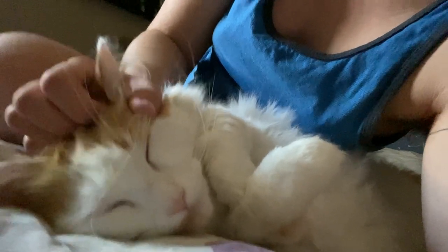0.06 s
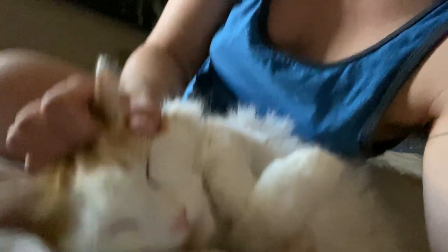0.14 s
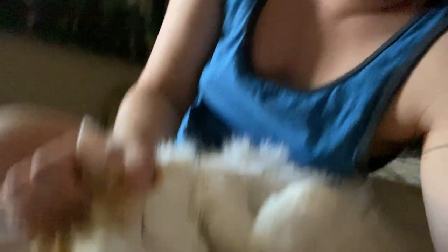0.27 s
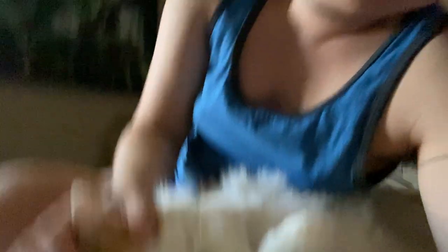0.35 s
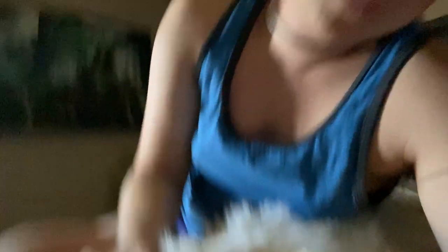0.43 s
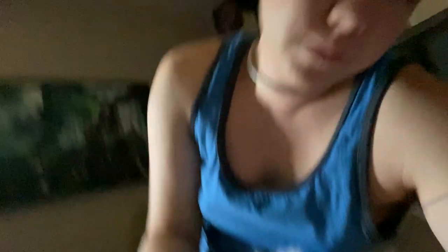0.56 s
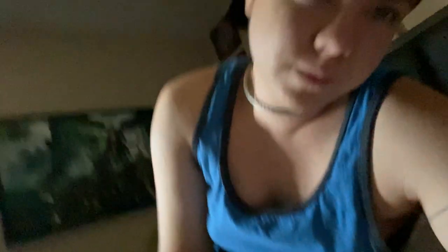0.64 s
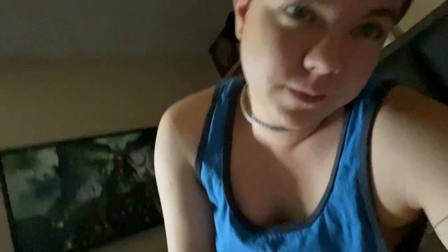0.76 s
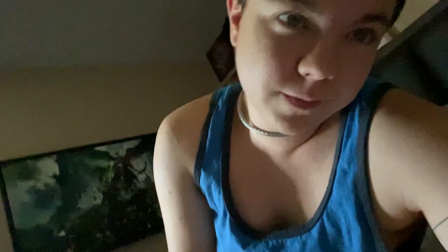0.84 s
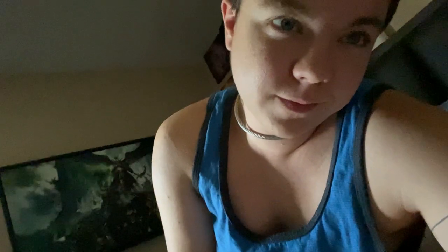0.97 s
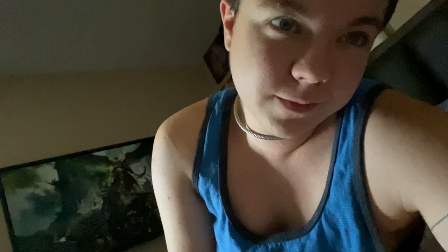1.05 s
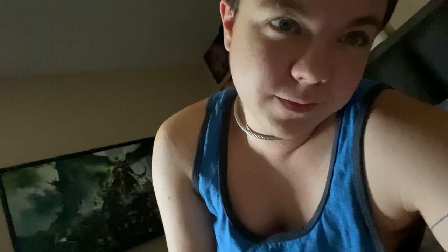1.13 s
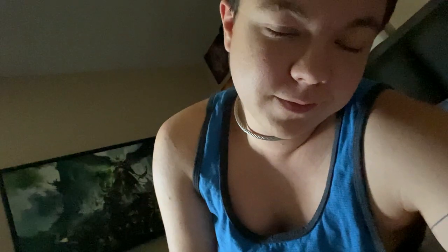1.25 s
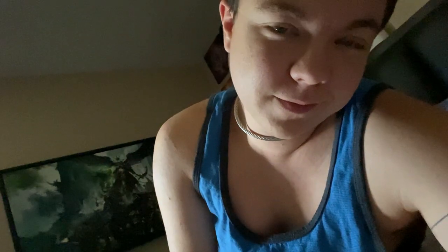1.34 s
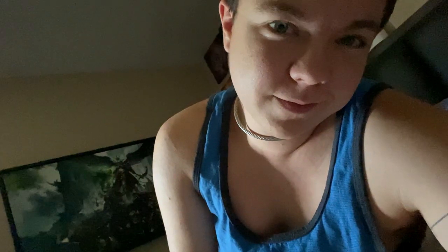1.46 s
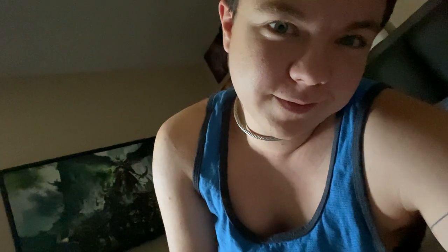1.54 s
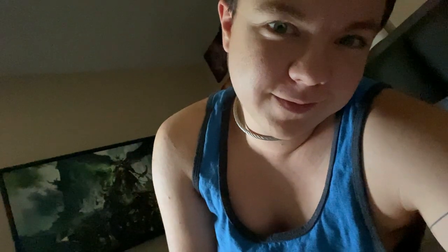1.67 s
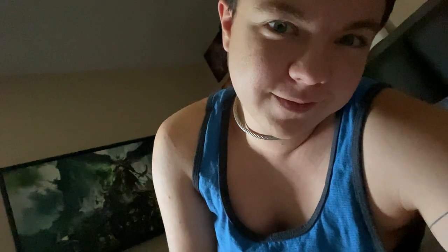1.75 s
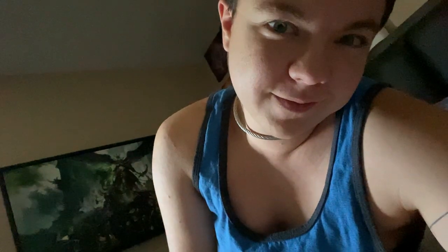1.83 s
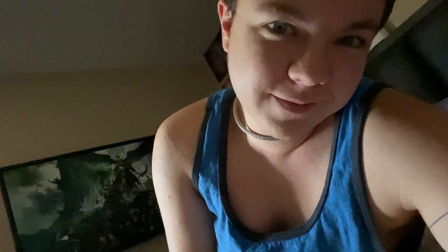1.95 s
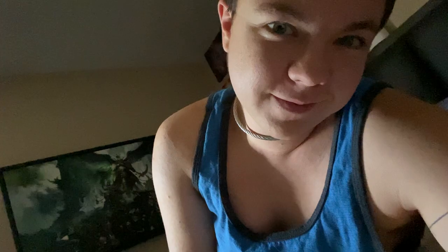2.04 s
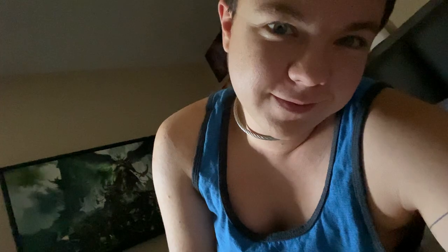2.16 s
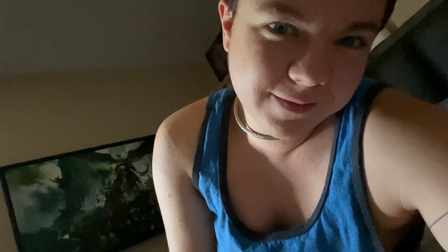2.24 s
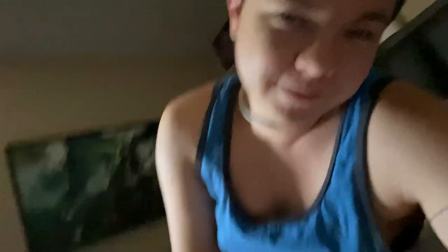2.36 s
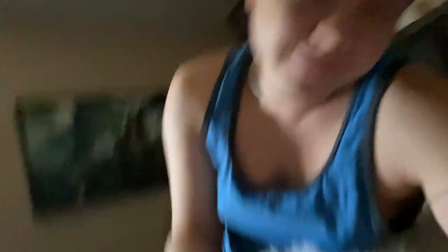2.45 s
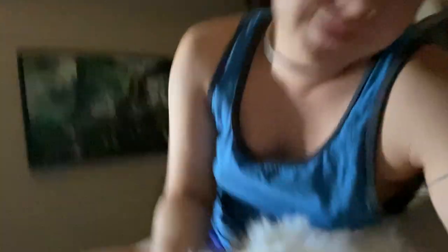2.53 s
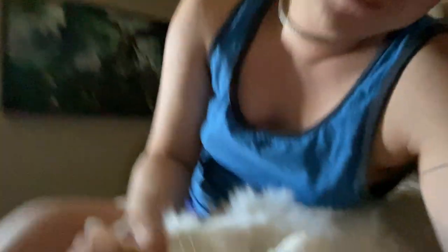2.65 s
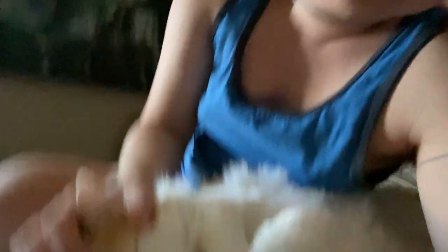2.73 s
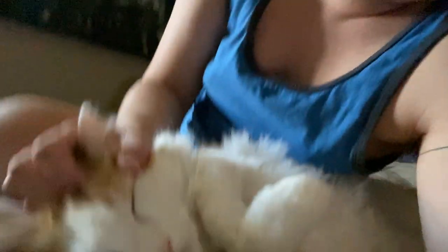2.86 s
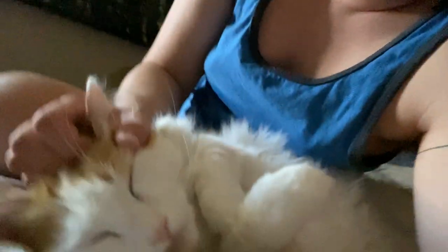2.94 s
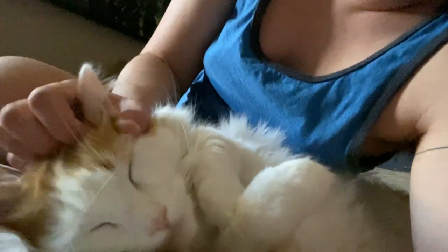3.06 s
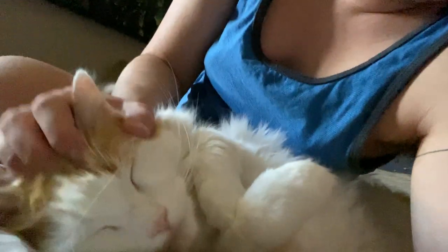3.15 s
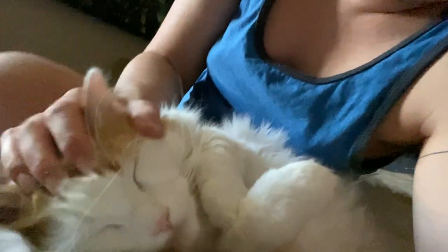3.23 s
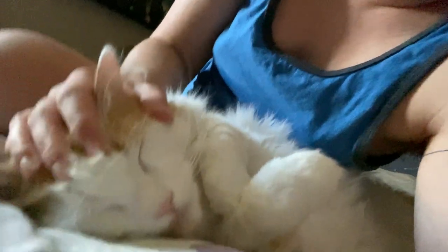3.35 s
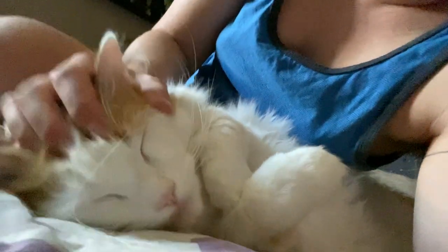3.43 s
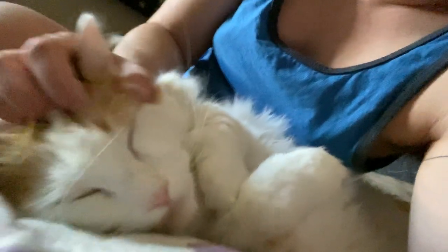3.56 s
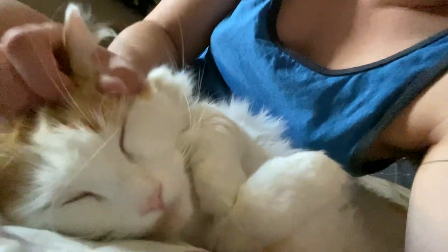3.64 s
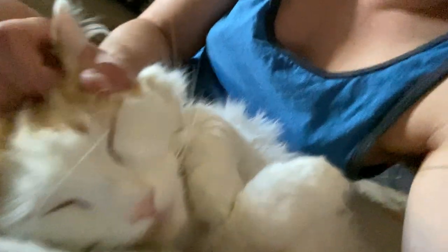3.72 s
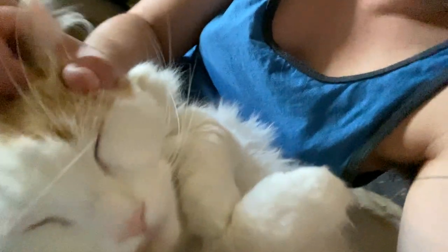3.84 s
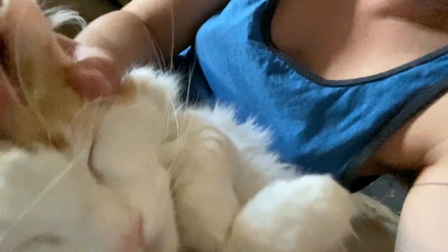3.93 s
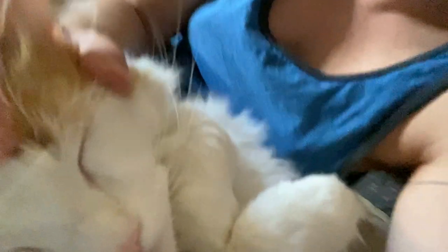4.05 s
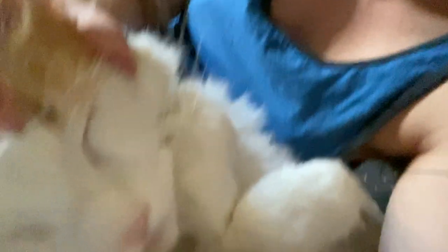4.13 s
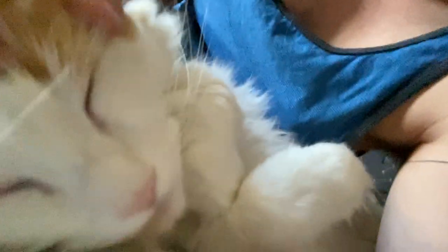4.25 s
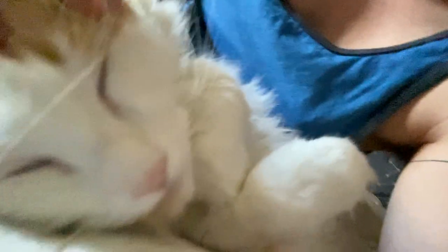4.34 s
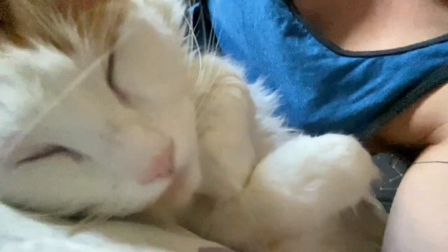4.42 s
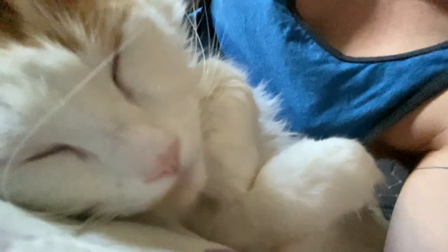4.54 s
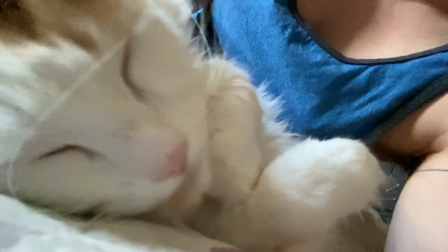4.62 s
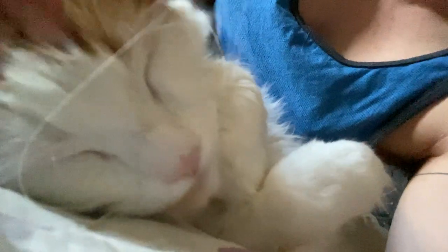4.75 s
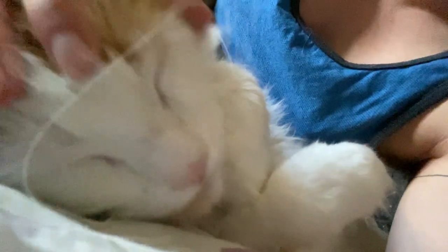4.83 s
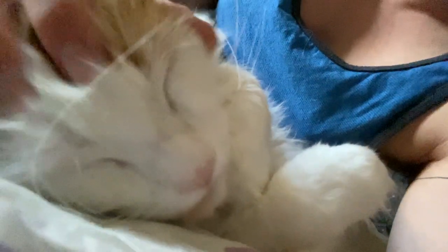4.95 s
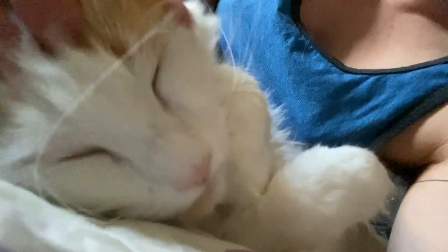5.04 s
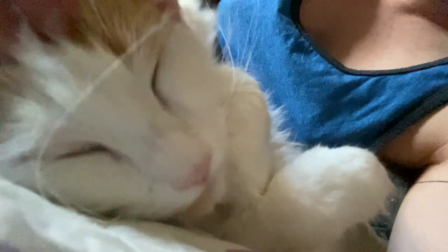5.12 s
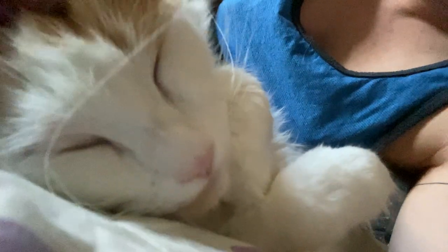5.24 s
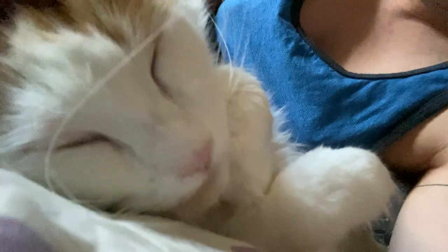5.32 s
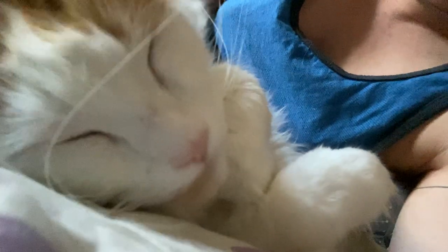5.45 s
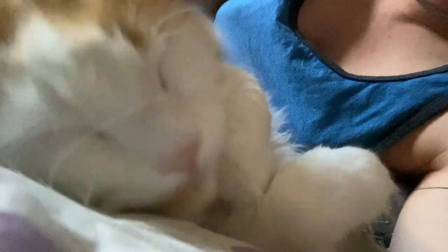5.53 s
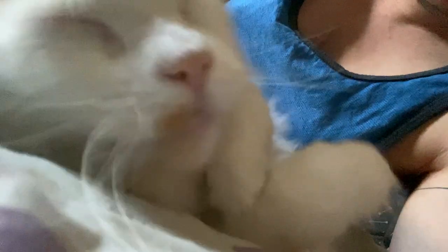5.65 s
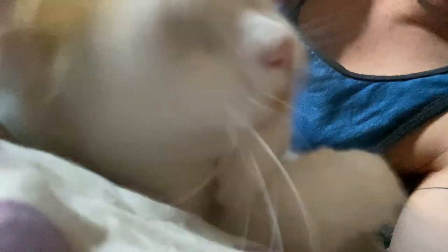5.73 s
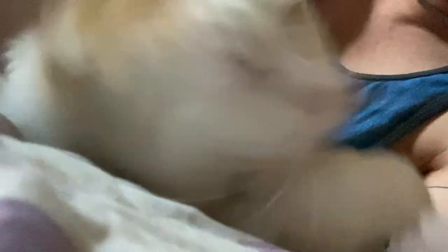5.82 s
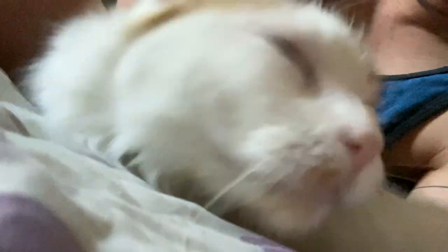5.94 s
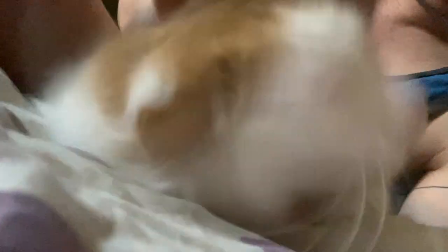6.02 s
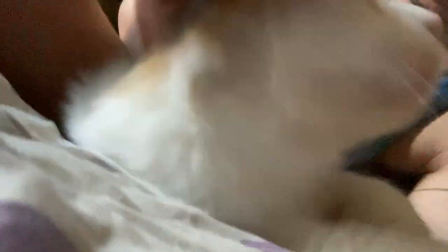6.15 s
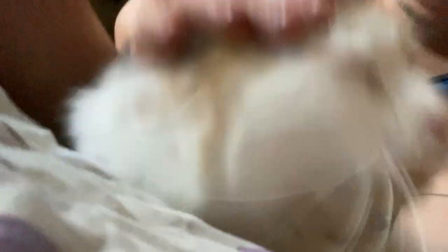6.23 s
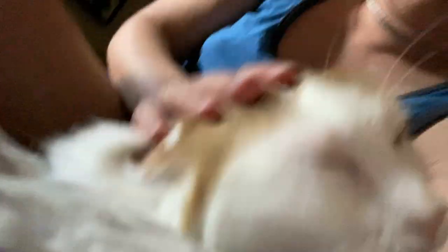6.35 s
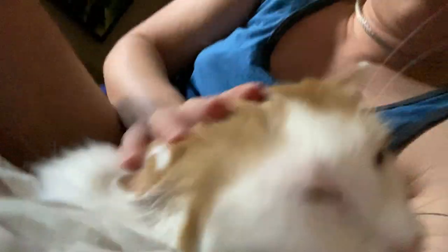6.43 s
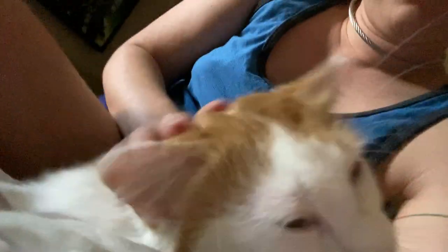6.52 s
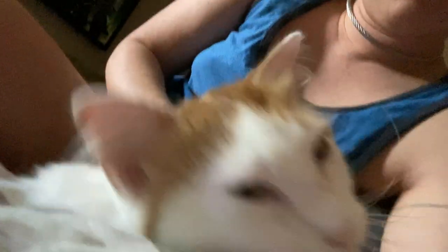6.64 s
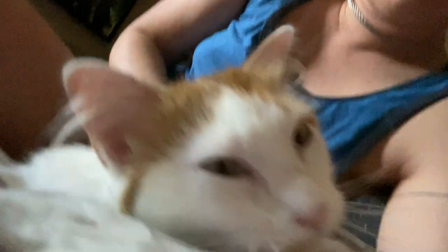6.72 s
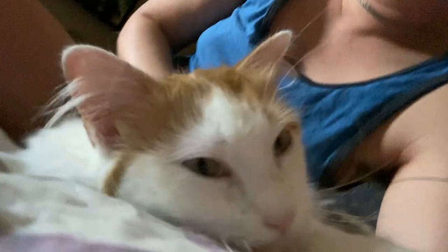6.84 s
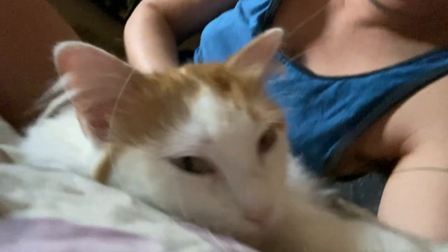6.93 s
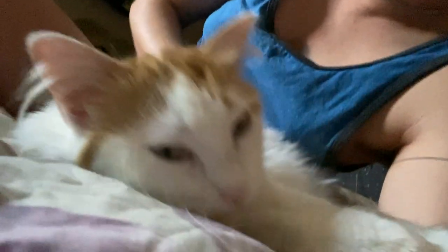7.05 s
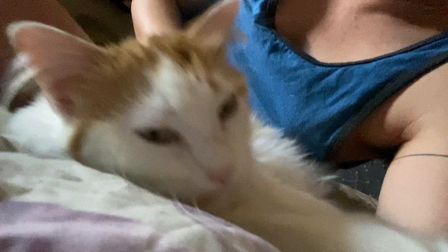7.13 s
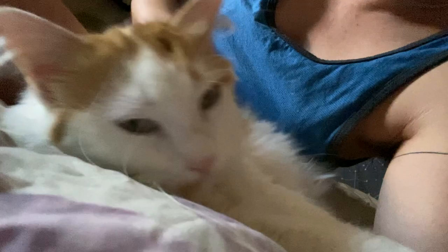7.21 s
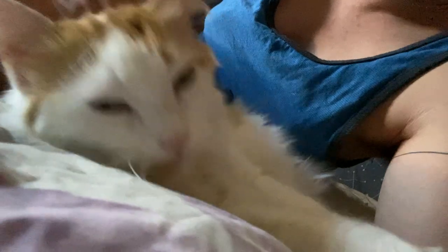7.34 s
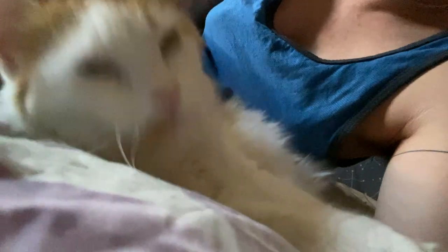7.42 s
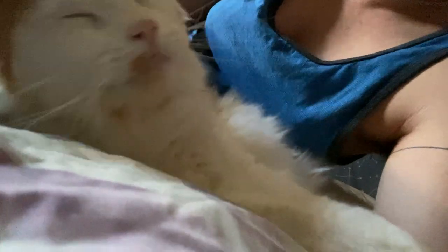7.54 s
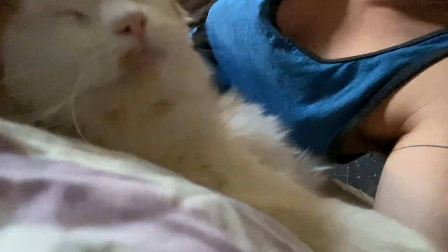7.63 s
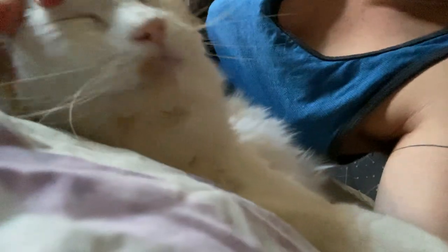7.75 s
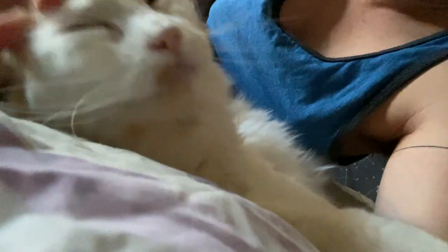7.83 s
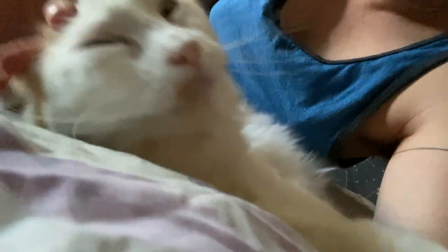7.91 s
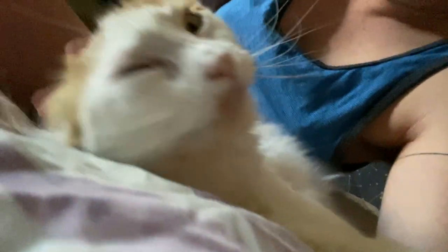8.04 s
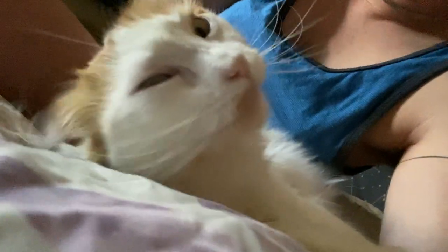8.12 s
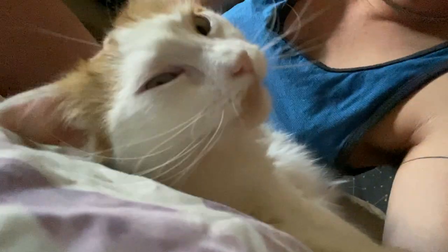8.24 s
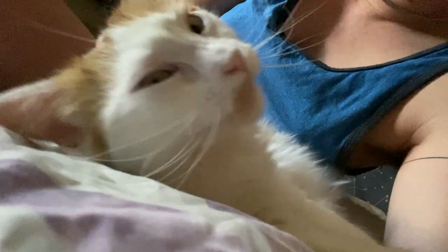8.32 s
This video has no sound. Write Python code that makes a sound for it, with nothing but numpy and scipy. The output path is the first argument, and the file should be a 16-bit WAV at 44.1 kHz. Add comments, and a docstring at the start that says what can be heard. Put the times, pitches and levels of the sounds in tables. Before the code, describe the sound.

A cat purrs close to a handheld stereo microphone in a quiet room with dull air noise and faint hum. The purr flutters about 28 times a second. From 0 to 0.9 s an in-breath fades as the microphone turns away, with light brushing of fur; after a pause a dull out-breath runs from 1.3 to 2.4. At 2.65-3.9 an in-breath comes nearer. From 4.1 it swells quickly into a strong, rattling out-breath until 5.4, nearer the left, under soft hissing strokes. A crisp in-breath lasts from 5.5 to 6.7; at 5.75-6.3 the cheek rubs the microphone with crackling scrapes, whisker sizzle and low damped thuds, followed by a thin nasal wheeze. Stroking is strongest around 6.5. Near 7.0 cloth gives a short rising groan. A rough, buzzing out-breath runs from 7.1 to 8.1, then another in-breath begins before the end.

```python
"""A cat purrs on a bed close to a hand-held phone while a hand strokes fur and bedding in a quiet room.
A glottis flutters about 27-31 times a second and drives chest, windpipe, throat, mouth and nose
resonances: snaps, doubled when driven hard, rattles and a closing thump, heavier on the way out.
Fur and bedding are filtered noise with hair clicks. Later the cheek rubs and scrapes the phone (noise
bursts), the head nudges it (damped thuds) and cloth groans under the hand (a rising tone)."""
import sys
import numpy as np
from scipy import signal
from scipy.fft import rfft, irfft, next_fast_len
from scipy.io import wavfile
from scipy.ndimage import uniform_filter1d, map_coordinates

SR = 44100
rng = np.random.default_rng(int(sys.argv[2]) if len(sys.argv) > 2 else 0)


def generate_wav(sig):
    """Save sig (samples, or channels by samples) to the path in sys.argv[1] as 16-bit PCM at SR."""
    pcm = np.round(np.clip(np.atleast_2d(sig).T, -1, 1) * 32767).astype(np.int16)
    wavfile.write(sys.argv[1], SR, pcm)


N = 369558
T = np.arange(N) / SR

# breaths: way, start_s, end_s, first_hz, middle_hz, last_hz (flutter rate), rattle_ms (mid-breath, per cycle),
# later (slaps after the first, ratio to it), body_db, body_swell_db (over the breath), hollow_db (windpipe),
# throat_db, swell_db (throat), mouth_db (snap), tick_db (against the snap), nose_low_db, nose_high_db
BREATHS = [("in", -0.005, 0.94, 29.7, 28.75, 29.6, 2.3, .05, -54.5, -9, -59.5, -63.5, -15, -67, -6, -76, -86),
           ("out", 1.297, 2.44, 28.99, 27.73, 27.59, 2.46, 0.26, -55, 0.86, -63.5, -67.5, 2.1, -70, -8, -74, -82),
           ("in", 2.647, 3.94, 29.3, 28.85, 29.04, 2.2, 0.16, -52.5, -0.3, -57.5, -60, 3.5, -65.5, -6, -75.5, -87.5),
           ("in", 4.1155, 4.47, 28.0, 28.1, 28.3, 3.16, .05, -49, 9.2, -55, -51.5, 21, -61, -6, -78.5, -93),
           ("out", 4.471, 5.36, 28.0, 27.8, 27.48, 10, 0.34, -45, -3.5, -60, -57, -0.81, -65, -2.8, -72.5, -76),
           ("in", 5.504, 6.69, 29.72, 29.31, 30.01, 2.95, 0.12, -50.5, -0.73, -58, -56, -0.69, -61, -4, -86, -83.5),
           ("out", 7.063, 8.08, 29.2, 27.35, 28.2, 11.5, 2.1, -49.5, -7, -57, -56.5, 0, -63, -10, -72.5, -78),
           ("in", 8.135, 8.45, 29, 31, 25, 2.67, 0.12, -52.5, 10, -61, -57.5, 6.8, -62.5, -7, -75.5, -95)]
# how far the phone points away from the cat: time_s, away (0-1)
AWAY = [(.3, 0.93), (.7, 1), (2.4, 1), (2.8, 0.7)]
# spectrum of the cheek against the phone: freq_hz, level_db
CHEEK = [(200, 2.5), (800, -4.5), (1400, -12), (2600, -9), (4000, -11.5), (9000, -21.5)]
ATTACK_S, RELEASE_S = 0.046, 0.096  # ramps of breaths, wheezes and the lean
PAUSE_MOUTH_DB = -25  # mouth and nose between breaths


def undb(db):
    """Decibels to gain."""
    return 10 ** (np.asarray(db) / 20)


def follow(rows, t=T):
    """Every column of a curve at the times t."""
    s, *columns = np.transpose(rows)
    return [np.interp(t, s, c) for c in columns]


def read(points, hz):
    """A spectrum at the frequencies hz, interpolated over log frequency."""
    f, value = np.transpose(points)
    return np.interp(np.log(hz + 1), np.log(f), value)


def unit(x):
    """Scales to rms 1."""
    return x / np.sqrt(np.mean(x ** 2) + 1e-20)


def steady(x, size=3060):
    """Levels to a running rms of 1, taken on the mid channel over a few purr cycles."""
    mid = np.atleast_2d(x).mean(0)
    power = uniform_filter1d(uniform_filter1d(mid ** 2, size), size)
    return x / np.sqrt(abs(power) + 1e-4 * np.mean(mid ** 2))


def colour(x, points, size=8192):
    """Causal minimum-phase filter with the given spectrum: the lows ring on after the highs."""
    log_gain = np.log(undb(read(points, abs(np.fft.fftfreq(size, 1 / SR)))))
    spectrum = np.exp(np.conj(signal.hilbert(log_gain)))
    taps = np.fft.ifft(spectrum).real[:size // 2]
    return signal.oaconvolve(x, taps)[:N]


def resonate(x, hz, width_hz):
    """A resonance of peak gain about 1 whose frequency may move: shift to 0 Hz, low-pass, shift back."""
    turn = np.exp(2j * np.pi * np.cumsum(hz * np.ones(N)) / SR)
    r = np.exp(-np.pi * width_hz / SR)
    return 2 * (turn * signal.lfilter([1 - r], [1, -r], x / turn + 1e-18)).real


def resonate_twice(x, hz, width_hz):
    """Two equal resonances in a row, for steeper skirts."""
    return resonate(resonate(x, hz, width_hz), hz, width_hz)


def clicks(times_s, sizes):
    """A train of single impulses."""
    at = np.clip(np.round(np.ravel(times_s) * SR).astype(int), 0, N)
    return np.bincount(at, np.ravel(sizes), N + 1)[:N]


def place(x, side_db, lead_ms):
    """Spreads a sound over both microphones by level and delay; it reaches the left one first."""
    ratio, lag = undb(side_db), lead_ms * SR / 1000
    late = map_coordinates(x, [np.arange(N) - lag], order=3)
    return np.array([ratio * x, late]) * 2 / (1 + ratio)


def wander(per_s):
    """A random curve through normal values drawn per_s times a second."""
    values = rng.standard_normal(1000)
    return np.interp(T * per_s, np.arange(len(values)), values)


def held(start_s, end_s, rise_s, fall_s):
    """A gate of 0-1 that is half open at start and at end."""
    return np.clip(.5 + np.minimum((T - start_s) / rise_s, (end_s - T) / fall_s), 0, 1)


def droop(x, lag_cycles=0.7, knee_hz=160):
    """Soft tissue passes the lows later than the highs, so each slap sweeps downward."""
    hz = np.fft.rfftfreq(2 * N, 1 / SR)
    return irfft(rfft(x, 2 * N) * np.exp(-2j * np.pi * lag_cycles * np.log1p(hz / knee_hz)))[:N]


def breath(t=T):
    """The breath under way at the times t: its columns by name, way, outflow and progress 0-1."""
    # names of the numeric columns of BREATHS, in order
    names = "start end first middle last rattle later body body_swell hollow throat swell mouth tick nose_low nose_high".split()
    # share of the body's push that comes as the glottis shuts: way -> outflow (0-1)
    outflow = {"in": 0.34, "out": 0.66}
    rows = np.array([row[1:] for row in BREATHS])
    which = np.maximum(np.searchsorted(rows[:, 0], t, "right") - 1, 0)
    now = {name: column[which] for name, column in zip(names, rows.T)}
    now["outflow"] = np.array([outflow[row[0]] for row in BREATHS])[which]
    now["inward"] = np.array([row[0] == "in" for row in BREATHS])[which]
    now["along"] = np.clip((t - now["start"]) / (now["end"] - now["start"]), 0, 1)
    return now


def surge(t=T):
    """Changes of effort at the times t, as Gaussian bumps: throat dB, body dB, rattle ms."""
    # surges within a breath: time_s, half_length_s, throat_db, body_db, added_rattle_ms
    surge_rows = [(0.857, 0.075, 2.5, 1, 0.5), (1.436, 0.049, 5.5, 5, 0.5), (2.243, 0.022, 0, 10, 1),
                  (2.693, 0.044, -3.5, -5, 0), (2.859, 0.084, 6.5, 1, 4.5), (4.117, 0.0095, 11, 0, -0.5),
                  (4.293, 0.031, 3.5, 5, 2), (4.803, 0.056, 5, 3, -0.5), (5.969, 0.11, 7, 1, 2),
                  (6.149, 0.035, 10, 2.5, 3.5), (6.271, 0.07, 11, -1, 0.2), (7.306, .025, 6, -1, -2),
                  (7.552, 0.046, -1.5, 5, 0), (7.625, 0.019, -2, -1, 0.5), (7.7, 0.04, 6, 3.5, -2),
                  (8.033, 0.02, -6.5, 2, 0.5), (8.07, 0.0087, 8.5, 4, -1.5)]
    s, half_s, throat_db, body_db, rattle_ms = np.transpose(surge_rows)
    bumps = np.exp(-((t[:, None] - s) / half_s) ** 2)
    return bumps @ throat_db, bumps @ body_db, bumps @ rattle_ms


def rattle(t, edge_ms=2.3):
    """Rattle length in ms of cycles starting at t: edge_ms at the breath's ends, arched, plus surges."""
    now = breath(t)
    arch = np.sqrt(abs(np.sin(np.pi * now["along"])))
    return edge_ms + (now["rattle"] - edge_ms) * arch + surge(t)[2]


def flutter(now):
    """Counts the cycles of the glottis; each breath restarts the run, its rate a parabola over the breath."""
    u = now["along"]
    rate_hz = now["first"] * (1 - u) * (1 - 2 * u)
    rate_hz = rate_hz + now["middle"] * 4 * u * (1 - u) + now["last"] * u * (2 * u - 1)
    starts = []
    for s in np.unique(now["start"]):
        inside = now["start"] == s
        t, run_hz = T[inside], rate_hz[inside]
        turns = np.cumsum(run_hz) / SR + (t[0] - s) * run_hz[0]
        starts.extend(np.interp(np.arange(round(turns[-1])), turns, t))
    return np.interp(T, starts + [starts[-1] + 1 / rate_hz[-1]], np.arange(len(starts) + 1))


def strength(now, size=700, early_s=0.0073, pause_body_db=-10, pause_throat_db=-19.5,
             mouth_per_swell=0.63, mouth_per_surge=0.85):
    """Each breath sets in, swells or sinks, and idles in the pause; dB of body, windpipe, throat, mouth."""
    # air starts to flow early_s before the first beat
    flowing = sum(held(start - early_s, end, ATTACK_S, RELEASE_S) for _, start, end, *_ in BREATHS)
    pause = 1 - np.minimum(flowing, 1)
    ramp = now["along"] - .5
    throat_surge, body_surge, _ = surge()
    body_swell, throat_swell = now["body_swell"] * ramp, now["swell"] * ramp
    body = now["body"] + body_swell + body_surge + pause_body_db * pause
    throat = now["throat"] + throat_swell + throat_surge + pause_throat_db * pause
    mouth = now["mouth"] + mouth_per_swell * throat_swell + mouth_per_surge * throat_surge
    mouth = mouth + PAUSE_MOUTH_DB * pause
    hollow = now["hollow"] + body_swell + (body_surge + throat_surge) / 2 + pause_throat_db * pause
    return uniform_filter1d(np.array([body, hollow, throat, mouth]), size), pause


def glottis(turns, jitter_in_ms=.5, jitter_out_ms=.8, uneven_db=1.74, force_db=3.5, between=0.96,
            slip=0.045, push_ms=1.78, close_ms=19., close_slap=0.055, count=6,
            strain_db=-52.5, slap_per_db=0.24):
    """Each cycle snaps open, slaps again or rattles, and shuts with a thump: openings, slaps, pushes."""
    ms = 1 / 1000
    start = np.interp(np.arange(int(turns[-1]) + 1), turns, T)
    chance = rng.standard_normal((len(start), 5))
    early, force = rng.standard_normal((2, len(start), count))
    rattle_ms, now = rattle(start), breath(start)
    outflow = now["outflow"]
    jitter_ms = np.where(now["inward"], jitter_in_ms, jitter_out_ms)
    # a throat driven above strain_db slaps harder after the first slap
    effort_db = now["throat"] + now["swell"] * (now["along"] - .5) + surge(start)[0]
    later = now["later"] + slap_per_db * np.maximum(effort_db - strain_db, 0)
    start = start + jitter_ms * ms * chance[:, 0]
    size = undb(uneven_db * chance[:, 1])
    length_s = abs(rattle_ms) * ms * np.exp(.2 * chance[:, 2])
    # a short rattle is one more slap; a long one fills in between; its later slaps swell toward their middle
    share = np.linspace(0, 1, count)
    long = np.clip(rattle_ms / 10 - .3, 0, 1)[:, None]
    inner = (share > 0) & (share < 1)
    profile = np.where(inner, between * long * np.sin(np.pi * share), 1 - 0.83 * long)
    weight = later[:, None] * profile * undb(force_db * force)
    slap_s = start[:, None] + length_s[:, None] * (share + slip * early * inner)
    slaps = clicks(slap_s, np.where(share > 0, weight, 1) * size[:, None])
    shut = start + (close_ms + 1.59 * chance[:, 3]) * ms
    closing = clicks(shut, size * outflow * undb(2.6 * chance[:, 4]))
    pushes = clicks(start + push_ms * ms + length_s / 4, size * (1 - outflow)) + closing
    return clicks(start, size), slaps + close_slap * closing, pushes


def strays(turns, share=.35, level_db=-4.0, spread_db=3):
    """Now and then the glottis gives an extra flap between two beats."""
    when, chance, size = rng.random((3, int(turns[-1])))
    times_s = np.interp(np.arange(len(when)) + .33 + .25 * when, turns, T)
    return clicks(times_s, (chance < share) * undb(level_db + spread_db * (2 * size - 1.5)))


def purr(chest_hz=58, chest_width_hz=30, throat_width_hz=240, throat_wander=0.07, chest_db=-4.0,
         chest_wander_db=2.5, snap_db=1, rough=0.023, wall_lag_cycles=0.48, chest_away_db=-4,
         leaning_db=6.0, hollow_hz=250, hollow_width_hz=170, uneven_in_db=1.17, uneven_out_db=2.0,
         stray_in=.7, stray_out=0.85, chest_out_db=3, tick_air=0.19, ahead_s=0.016):
    """Glottal impulses drive chest, body wall, windpipe, throat, mouth and nose resonances, in stereo."""
    # main throat resonance: time_s, freq_hz
    throat_curve = [(0, 523), (2.8, 510), (3.8, 476), (4.35, 463), (5.6, 468), (7.2, 443), (7.65, 430),
                    (7.88, 495)]
    # position of the cat: time_s, body_left_right_db, head_left_right_db, left_lead_ms
    place_curve = [(0, 2, 13, 0.27), (.8, -1, 6.5, 0.093), (2.3, -1.5, 7.5, 0.073), (2.8, 1.5, 10, 0.24),
                   (3.6, 2.5, 9, 0.28), (4.3, 8, 20, 0.32), (5.3, 7, 27, 0.3), (5.8, 10, 14, 0.19),
                   (6.3, 2, 3.5, 0.13), (7.3, 2.5, 9.5, 0.26), (7.8, 7, 13, 0.31), (8.38, 2, 11, 0.25)]
    # spectra of body thump, throat, snap and tick: freq_hz, level_db
    thump_spectrum = [(25, -41), (55, -16.5), (85, -1), (125, 6), (175, 5), (260, -8), (340, -11.5),
                      (480, -20), (900, -50), (3000, -99.5)]
    throat_spectrum = [(100, -27), (250, -7.5), (350, -1), (550, 0), (700, -15.5), (1000, -39.5),
                       (2500, -58.5)]
    snap_spectrum = [(200, -25.5), (620, -15.5), (760, -4), (880, 2), (1100, -1.5), (1450, -4.5),
                     (1800, -14.5), (2600, -36.5), (5000, -33.5), (12000, -90)]
    tick_spectrum = [(600, -43.5), (1500, 5.5), (2500, 7.5), (3400, 2), (4400, -1.5), (5300, -7),
                     (8300, -8), (12000, -8), (16000, -13)]
    now = breath()
    inward = now["inward"]
    turns = flutter(now)
    opening, slaps, pushes = glottis(turns)
    (body_level, hollow_level, throat_level, mouth_level), pause = strength(breath(T + ahead_s))
    body_side, head_side, lead_ms = follow(place_curve)
    # every slap lets go a brief puff of turbulence, decaying in 2.5 ms
    puffs = signal.lfilter([1], [1, -np.exp(-1 / (0.0025 * SR))], slaps) * rng.standard_normal(N)
    flaps = slaps + strays(turns) * np.where(inward, stray_in, stray_out) + rough * puffs
    drive = droop(flaps)
    uneven_db = np.where(inward, uneven_in_db, uneven_out_db)
    wall = droop(colour(pushes, thump_spectrum), wall_lag_cycles)
    chest = resonate_twice(wall, chest_hz, chest_width_hz)
    chest_level = body_level + chest_db + chest_wander_db * wander(6.3) + chest_away_db * follow(AWAY)[0]
    # the cat leans its chest toward the phone
    chest_level = chest_level + leaning_db * held(6.36, 6.78, ATTACK_S, RELEASE_S)
    chest_level = chest_level + chest_out_db * uniform_filter1d(1. - inward, size=2000)
    hollow = resonate_twice(drive, hollow_hz, hollow_width_hz)
    # the throat shifts from one cycle to the next
    throat_hz = follow(throat_curve)[0] * (1 + throat_wander * wander(28))
    ring = colour(resonate(drive, throat_hz, throat_width_hz), throat_spectrum)
    snap = colour(flaps, snap_spectrum)
    ring_level = throat_level + uneven_db * wander(28)
    snap_level = mouth_level + snap_db + uneven_db * wander(28)
    parts = [(chest, chest_level, body_side),
             (wall, body_level, body_side),
             (hollow, hollow_level, (body_side + head_side) / 2),
             (ring, ring_level, head_side),
             (snap, snap_level, head_side)]
    low = sum(undb(level) * steady(place(x, side, lead_ms)) for x, level, side in parts)
    low = low + place(burr(turns), head_side, lead_ms)
    tick = steady(colour(opening + .5 * slaps + tick_air * puffs, tick_spectrum))
    tick = undb(mouth_level + now["tick"]) * tick
    high = tick + nose(now, pause, turns, slaps, opening) + bite(now, mouth_level, slaps) + wheeze(turns)
    return low + place(high, -3.5, lead_ms)


def nose(now, pause, turns, slaps, opening, low_hz=4600, high_hz=8500, top_hz=11900, low_width_hz=420,
         high_width_hz=900, top_width_hz=2600, sag=0.094, air_share=1.0, air_in=0.51, air_out=0.56,
         top_db=-6.0, level_db=5, uneven_db=3.5, low_per_swell=0.39, high_swell_db=14.5, away_db=-6.5):
    """Slaps and pulsed air ring the nasal passage; its low resonance gets more air and sits lower going out."""
    gate = np.exp(-(((turns + .3) % 1 - .5) / .25) ** 2) + .12
    air, knock = unit(gate * rng.standard_normal(N)), unit(slaps + opening)
    hz = low_hz * (1 - sag * now["outflow"])
    low_drive = knock + np.where(now["inward"], air_in, air_out) * air
    low = resonate(resonate(low_drive, hz, low_width_hz), hz, 2 * low_width_hz)
    high_drive = air + air_share * knock
    high = resonate_twice(high_drive, high_hz, high_width_hz)
    top = resonate_twice(high_drive, top_hz, top_width_hz)
    ramp, turned_db = now["along"] - .5, away_db * follow(AWAY)[0]
    low_db = now["nose_low"] + low_per_swell * now["swell"] * ramp + turned_db
    high_db = now["nose_high"] + high_swell_db * ramp
    upper = unit(high) + undb(top_db + turned_db) * unit(top)
    gain = undb(level_db + uneven_db * wander(25) + PAUSE_MOUTH_DB * pause)
    return gain * (undb(low_db) * steady(low) + undb(high_db) * upper)


def bite(now, mouth_level, slaps, hz=2300, width_hz=480, hard_db=-58, level_db=-9, growth=0.99,
         air_in=.35, air_out=1.6, out_db=-3):
    """The snaps ring a higher resonance of the mouth: crisp on the way in, airy on the way out."""
    drive = steady(slaps) + np.where(now["inward"], air_in, air_out) * rng.standard_normal(N)
    ring = steady(resonate_twice(drive, hz, width_hz))
    way_db = np.where(now["inward"], 0, out_db)
    return undb(hard_db + level_db + growth * (mouth_level - hard_db) + way_db) * ring


def stroking(rise_s=0.11, fall_s=0.12, resting_db=-91.5):
    """Gain of the hand's brushing: it rests lightly between strokes."""
    # strokes over fur and bedding: start_s, end_s, relative_level_db
    stroke_rows = [(-.05, 0.107, -76.5), (0.34, 0.432, -76), (0.622, .78, -92), (1.8, 2.317, -92),
                   (2.8, 3.0, -78.5), (3.15, 3.302, -78), (3.54, 4.07, -71.5), (4.218, 4.897, -74),
                   (4.93, 5.304, -70), (5.55, 5.895, -66.5), (6.022, 6.423, -70), (6.447, 6.753, -62.5),
                   (6.765, 7.023, -65.5), (7.022, 8.259, -71), (8.26, 8.5, -74)]
    strokes = sum(undb(db) * held(start, end, rise_s, fall_s) for start, end, db in stroke_rows)
    return undb(resting_db) + strokes


def fur(level_db=5, hairs_per_s=500, spread_db=5, grainy=0.6, patchy_db=2.5, near=0.38, lead_ms=.11):
    """A wide, uneven brushing hiss, with single hairs and folds flicking past the fingers."""
    # spectrum of the brushing: freq_hz, level_db
    fur_spectrum = [(200, 10.5), (700, 11), (1500, 4), (2500, 4.5), (4000, 4.5), (6300, 1), (8000, 0.5),
                    (12000, 3), (14000, 7), (16000, -6)]
    hit = rng.random(N) < hairs_per_s / SR
    hairs = hit * undb(spread_db * np.minimum(rng.exponential(1, N), 4)) * rng.choice([-1, 1], N)
    brush = rng.standard_normal((2, N)) + grainy * place(unit(hairs), 0, 0.11)
    brush = brush + near * place(rng.standard_normal(N), 0, lead_ms)
    gain = stroking() * undb(level_db + patchy_db * wander(22))
    return gain * unit(np.array([colour(channel, fur_spectrum) for channel in brush]))


def room_air(level_db=-59, rumble_hz=42):
    """Steady dull air noise, alike in both channels only at the lows, and a faint hum of sines."""
    # air spectrum: freq_hz, level_db
    air_spectrum = [(18, -79), (30, -14), (41, 2), (64, -10), (85, -4.5), (114, 7), (187, -12), (237, 2),
                    (307, -14.5), (1140, -22), (1850, -24.5), (2330, -20.5), (2800, -24.5), (3880, -32.5),
                    (6000, -41.5), (15500, -45)]
    # likeness of the two channels: freq_hz, likeness (0-1)
    likeness = [(60, 0.96), (250, 0.65), (640, 0), (3000, 0.03)]
    # hum of an appliance: freq_hz, rms_db
    hum_rows = [(60, -65.5), (120, -64.5), (259, -72)]
    a, b = rfft(rng.standard_normal((2, next_fast_len(N))))
    hz = np.linspace(0, SR / 2, len(a))
    same = np.clip(read(likeness, hz), 0, 1)
    shape = undb(read(air_spectrum, hz)) * hz ** 2 / (hz ** 2 + rumble_hz ** 2)
    air = irfft(np.array([a, same * a + np.sqrt(1 - same ** 2) * b]) * shape)[:, :N]
    hum = sum(undb(db) * np.sqrt(2) * np.sin(2 * np.pi * (f * T + rng.random())) for f, db in hum_rows)
    return undb(level_db) * unit(air) + hum


def room_echo(x, size=256):
    """Sparse random reflections, each band dying at its own speed."""
    # decay of the room: freq_hz, t60_s
    decay = [(80, 0.28), (300, 0.19), (1500, 0.097), (10000, 0.14)]
    taps = rng.choice([-1., 1.], (2, SR // 2)) * (rng.random((2, SR // 2)) < 2000 / SR)
    taps[:, :size] = 0
    hz, t, z = signal.stft(taps, SR, nperseg=size)
    fade = undb(-60 * t / read(decay, hz)[:, None])
    tail = signal.istft(z * fade, SR, nperseg=size)[1]
    return signal.oaconvolve(x.mean(0)[None], tail / np.linalg.norm(tail[0]), axes=1)[:, :N]


def nuzzle(level_db=-58.0, at_s=6.1, lasts_s=0.35, patchy_db=6.5, grainy_db=5, grains_per_s=900):
    """The cat's cheek rubs along the phone with a dull, uneven, crackling rustle."""
    grains = rng.standard_normal(N)[(T * grains_per_s).astype(int)]
    rub = unit(colour(rng.standard_normal(N) * undb(grainy_db * np.minimum(grains, 2)), CHEEK))
    swell = np.exp(-((T - at_s) / lasts_s) ** 2)
    return place(undb(level_db + patchy_db * wander(70)) * swell * rub, 2.7, 0.12)


def scrapes(width_hz=1800, side_db=1, lead_ms=0.082, crack_db=25, grainy_db=4):
    """Each catch is a crack and a short, grainy rasp in one band under a sizzle of whiskers."""
    # cheek and whiskers catch on the phone: start_s, time_to_peak_s, scrape_db, scrape_hz, sizzle_db
    scrape_rows = [(5.739, 0.0073, -55, 2530, -52.5), (5.756, 0.00085, -47.5, 1300, -64),
                   (5.804, 0.0065, -65, 2600, -52.5), (6.043, 0.0031, -55.5, 2000, -55),
                   (6.078, 0.0058, -60, 1900, -58), (6.116, 0.0018, -45.5, 2900, -46.5),
                   (6.158, 0.0024, -48, 1800, -61), (6.2093, 0.0012, -42, 2700, -46.5),
                   (6.22, 0.0015, -47, 1390, -62), (6.231, 0.0011, -56, 1000, -68),
                   (6.269, 0.0017, -53, 1400, -71)]
    # spectrum of the whiskers: freq_hz, level_db
    sizzle_spectrum = [(1500, -10), (4000, 2), (7000, 3), (13000, -3), (16000, -12)]
    out, t = np.zeros(N), np.arange(SR // 8) / SR
    sizzle = unit(colour(rng.standard_normal(N), sizzle_spectrum))
    for s, peak_s, scrape_db, hz, sizzle_db in scrape_rows:
        span = slice(round(s * SR), round(s * SR) + len(t))
        edges_hz = [max(hz - width_hz / 2, 300), hz + width_hz / 2]
        band = signal.butter(2, edges_hz, "bandpass", fs=SR)
        noise, grain = rng.standard_normal((2, len(t)))
        rasp = unit(signal.lfilter(*band, noise * undb(grainy_db * grain)))
        envelope = t / peak_s * np.exp(1 - t / peak_s)
        out[span] += envelope * (undb(scrape_db) * rasp + undb(sizzle_db) * sizzle[span])
    s, peak_s, scrape_db, _, _ = np.transpose(scrape_rows)
    cracks = droop(colour(clicks(s + peak_s, undb(scrape_db + crack_db)), CHEEK))
    return place(out - cracks, side_db, lead_ms)


def nudges(peak_cycles=0.57, side_db=5):
    """The cat's head knocks the phone with a heavily damped thud."""
    # nudges: start_s, thud_db, thud_hz
    nudge_rows = [(5.770, -35, 76.5), (5.79, -31, 94), (5.885, -39, 51), (6.078, -34, 62),
                  (6.113, -29.5, 56), (6.189, -35, 69), (6.21, -31.5, 171)]
    out, t = np.zeros(N), np.arange(SR // 8) / SR
    for s, thud_db, hz in nudge_rows:
        age = t * hz / peak_cycles
        out[round(s * SR):][:len(t)] -= undb(thud_db) * age * np.exp(1 - age) * np.sin(2 * np.pi * hz * t)
    return place(out, side_db, 0.2)


def wheeze(turns, width_hz=900, late=0.3, spread=0.18):
    """The nose wheezes while the head is turned: thin resonant hiss partway through each cycle."""
    # wheezes: start_s, end_s, freq_hz, level_db
    wheeze_rows = [(5.932, 6.07, 4750, -66.5), (6.272, 6.697, 6170, -69.5), (6.302, 6.69, 4270, -64.5)]
    air = np.exp(-((turns % 1 - late) / spread) ** 2) * rng.standard_normal(N)
    out = np.zeros(N)
    for start, end, hz, db in wheeze_rows:
        hiss = unit(resonate_twice(air, hz, width_hz))
        out += undb(db) * held(start, end, ATTACK_S, RELEASE_S) * hiss
    return out


def drag(waver=0.071, waver_db=1.5, scuff_db=-58):
    """Cloth drags under the hand: a rising low groan and a soft scuff."""
    # groan of the bedding: time_s, level_db, pitch_hz
    drag_curve = [(6.82, -81, 74.4), (6.92, -56, 78.6), (7, -50, 94.6), (7.045, -42, 107), (7.07, -53, 130),
                  (7.16, -71, 135)]
    # spectrum of the scuff: freq_hz, level_db
    scuff_spectrum = [(150, -34), (350, -1), (600, 4), (800, -8.5), (1100, -28), (3000, -40), (9000, -63)]
    level_db, hz = follow(drag_curve)
    phase = 2 * np.pi * np.cumsum(hz * (1 + waver * wander(60))) / SR
    groan = np.sqrt(2) * np.sin(phase) * undb(waver_db * wander(40))
    sounding = (T > drag_curve[0][0]) * (T < drag_curve[-1][0])
    scuff = unit(colour(rng.standard_normal(N), scuff_spectrum)) * np.exp(-((T - 6.96) / .09) ** 2)
    return place(undb(level_db) * groan * sounding + undb(scuff_db) * scuff, 0.76, 0.19)


def burr(turns, late=.31, spread=0.1, late_wander=0.0609, pitch_wander=.08, fall=.25, overtone_db=-15,
         uneven_db=3.0):
    """Once a cycle the throat breaks into a few swings of a falling tone, a little different each time."""
    # buzz during the long breath out: time_s, pitch_hz, level_db
    burr_curve = [(7.12, 420.8, -60), (7.18, 379.8, -50), (7.215, 318.7, -49), (7.25, 469.8, -51),
                  (7.29, 419, -51), (7.35, 401, -51.5), (7.42, 450.3, -48), (7.49, 440, -54.5),
                  (7.545, 450.2, -48), (7.62, 472.2, -60), (7.69, 366.1, -52), (7.76, 459.2, -44),
                  (7.79, 485, -53), (7.86, 508, -53), (7.91, 500, -59), (7.97, 471.4, -59),
                  (8.02, 471, -68)]
    hz, level_db = follow(burr_curve)
    age = turns % 1 - late - late_wander * wander(20)
    phase = 2 * np.pi * np.cumsum(hz * (1 + pitch_wander * wander(70) - fall * age)) / SR
    tone = np.sin(phase) + undb(overtone_db) * np.sin(2 * phase)
    grains = steady(np.exp(-(age / spread) ** 2) * tone)
    sounding = (T > burr_curve[0][0]) * (T < burr_curve[-1][0])
    return undb(level_db + uneven_db * wander(28)) * grains * sounding


def scene(wet_db=-15, away_db=6):
    """The cat is close and dry, but more of the room is heard while the phone points away from it."""
    cat = purr()
    echo = undb(wet_db + away_db * follow(AWAY)[0]) * room_echo(cat)
    return cat + echo + fur() + nuzzle() + nudges() + scrapes() + drag() + room_air()


def record(dry, edge_hz=15850):
    """Colour of the microphone ports, then the band limit."""
    # response of the ports: freq_hz, level_db
    port_spectrum = [(8600, 1), (9400, -15), (10300, -3), (11000, -1), (13600, -4), (14800, -27),
                     (15600, -7)]
    heard = np.array([colour(channel, port_spectrum) for channel in dry])
    low_pass = signal.firwin(511, edge_hz, window=("kaiser", 9), fs=SR)
    return signal.oaconvolve(heard, low_pass[None], "same")


dry = scene()
out = record(dry)
generate_wav(out)
```